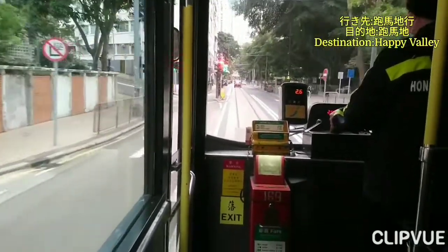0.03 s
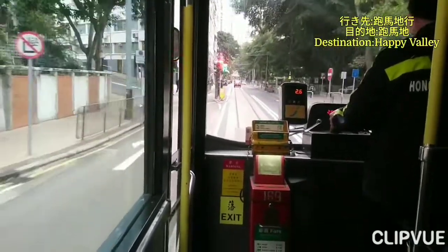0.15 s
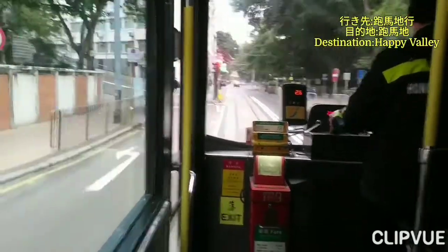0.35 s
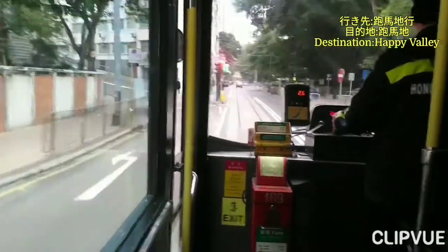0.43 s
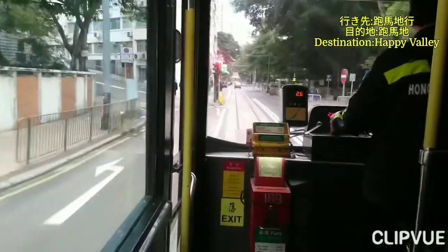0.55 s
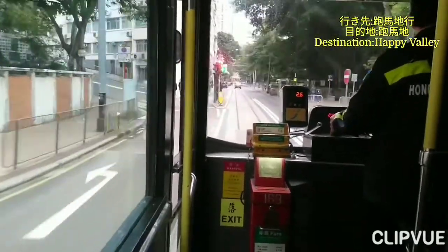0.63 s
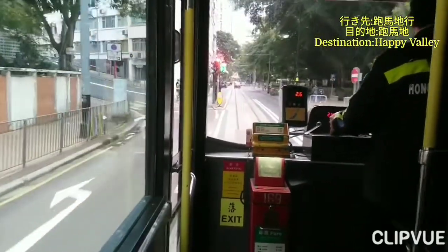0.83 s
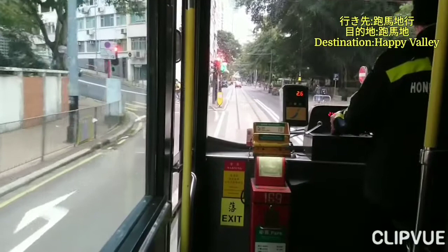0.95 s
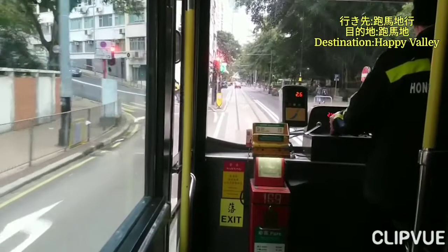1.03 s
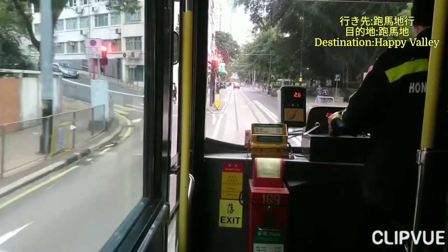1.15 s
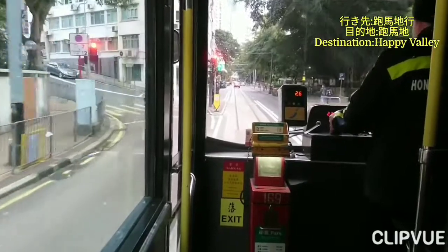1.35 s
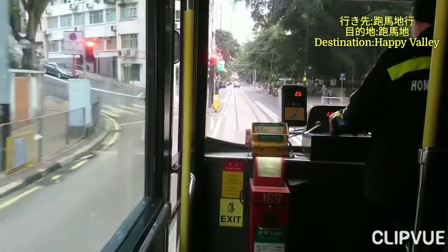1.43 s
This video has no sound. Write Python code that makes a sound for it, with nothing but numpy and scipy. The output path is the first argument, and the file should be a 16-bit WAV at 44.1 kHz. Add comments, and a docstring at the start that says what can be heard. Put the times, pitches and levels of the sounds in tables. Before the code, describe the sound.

Tram wheels knock heavily over a rail joint in two dull clusters, with low rolling rumble

```python
"""Two axles of a tram cross a rail joint: each gives a cluster of dull knocks, heard inside the cab.
The knocks are short low tones; shudders, rattles and ticking fittings are shaped noise and ringing taps.
Underneath are a low rumble and roar of rolling, made of coloured noise, and a wavering hum in the floor.
Short puffs of air, made of bright noise, hiss near the driver's desk."""
import sys
import numpy as np
from scipy import signal
from scipy.io import wavfile
from scipy.ndimage import uniform_filter1d

SR = 44100
rng = np.random.default_rng(int(sys.argv[2]) if len(sys.argv) > 2 else 0)


def to_wav(s):
    """Save 16-bit WAV."""
    ch = np.atleast_2d(s).T  # columns
    pcm = np.round(np.clip(ch, -1, 1) * 32767)  # PCM
    wavfile.write(sys.argv[1], SR, pcm.astype(np.int16))


N = 66150  # length in samples: 1.5 s

# loudness of the rolling over time: time_s, rumble_db, roar_db (the upper part)
ROLLING_LEVELS = [(0.0, -45.5, -59), (0.162, -40, -62), (0.35, -38.5, -62), (0.568, -40, -57.5),
                  (0.792, -42.5, -57.5), (0.94, -45, -58), (1.148, -44.5, -55.5), (1.5, -45, -56)]


def amp(db):
    """Turn decibels into a plain multiplier."""
    return 10 ** (np.asarray(db) / 20)


def evened(x):
    """Scale a signal to an average (RMS) strength of 1."""
    return x / np.sqrt(np.mean(x ** 2) + 1e-20)


def curve(table, column):
    """Join the points of one table column by straight lines; the first column is time."""
    rows = np.array(table)
    return np.interp(np.arange(N) / SR, rows[:, 0], rows[:, column])


def add(mix, start_s, sound):
    """Add a short sound to the mix in place, cut off at the end of the mix."""
    part = mix[round(start_s * SR):][:len(sound)]
    part += sound[:len(part)]


def noise(spectrum, patchy_db):
    """Noise of a given colour, built from random short-time spectra with drifting patches."""
    hz = np.fft.rfftfreq(2048, 1 / SR)
    real, imaginary, patches = rng.standard_normal((N // 512 + 5, 1025, 3)).T
    patches = uniform_filter1d(patches, size=10, axis=0)  # smooth across pitch
    patches = evened(uniform_filter1d(patches, size=4, axis=1))  # smooth over time
    table_hz, level_db = np.transpose(spectrum)
    colour_db = np.interp(np.log(hz + 1), np.log(table_hz + 1), level_db, left=-90, right=-90)
    frames = (real + 1j * imaginary) * amp(colour_db[:, None] + patchy_db * patches)
    return evened(signal.istft(frames, nperseg=2048, noverlap=1536)[1][:N])


def band(x, hz, width_hz):
    """Keep a band around one pitch: a resonance applied four times, for steep skirts."""
    turn = np.exp(2j * np.pi * hz * np.arange(len(x)) / SR)
    r = np.exp(-2 * np.pi * width_hz / SR)
    two_stages = [(1 - r) ** 2, 0, 0, 1, -2 * r, r * r]
    # shift the pitch down to zero, smooth, then shift back up
    smooth = signal.sosfilt([two_stages] * 2, x / turn)
    return 2 * (turn * smooth).real


def swells(rows):
    """Sum of loudness curves that swell smoothly to a peak and die exponentially."""
    t = np.arange(N) / SR
    total = np.zeros(N)
    for peak_s, db, rise_s, t60_s in rows:
        swell = np.exp(-.5 * ((t - peak_s) / rise_s) ** 2)
        fade = amp(-60 * np.maximum(t - peak_s, 0) / t60_s)
        total += amp(db) * np.where(t < peak_s, swell, fade)
    return total


def rolling():
    """Wheel on rail, heard through floor and windows: low rumble and upper roar of coloured noise."""
    # colour of each noise: pitch_hz, level_db (per Hz, relative)
    rumble_colour = [(18, -44), (30, -19.5), (54, -10), (130, -12.5), (203, 1), (317, 2.5), (387, -9),
                     (413, -9.5), (538, -15.5), (700, -30.5), (910, -51.5), (1540, -120)]
    roar_colour = [(240, -34), (400, -2), (640, -7.5), (791, -17.5), (1170, -13), (1310, -15), (1590, -19),
                   (3450, -27.5), (4130, -44), (15000, -56)]
    rumble = amp(curve(ROLLING_LEVELS, column=1)) * noise(rumble_colour, patchy_db=1.5)
    roar = amp(curve(ROLLING_LEVELS, column=2)) * noise(roar_colour, patchy_db=2.2)
    return rumble + roar


def hum():
    """The car body booms at one low pitch that wavers, with overtones and a rough band of noise."""
    # loudness of the hum: time_s, level_db
    hum_levels = [(0.0, -49.5), (0.086, -60.5), (0.312, -27.5), (0.35, -55.5), (0.376, -36), (0.4, -47.5),
                  (0.48, -32.5), (0.61, -34), (0.65, -26), (0.692, -43.5), (0.71, -39), (0.76, -38.5),
                  (0.848, -35.5), (0.88, -40), (0.926, -31.5), (0.98, -33), (1.076, -68), (1.14, -50),
                  (1.178, -68), (1.232, -51.5), (1.356, -52.5), (1.386, -70), (1.424, -40), (1.5, -59)]
    # overtones: multiple of the hum pitch, level_db relative to the lowest tone
    overtones = [(2, -17.5), (3, -14)]
    pitch_hz, waver, roughness = 55.25, 0.023, 0.45  # waver: typical drift as a share of the pitch
    drift = evened(uniform_filter1d(rng.standard_normal(N), size=3000))
    phase = 2 * np.pi * np.cumsum(pitch_hz * (1 + waver * drift)) / SR
    tone = np.cos(phase)
    for multiple, db in overtones:
        tone += amp(db) * np.cos(multiple * phase)
    rough = evened(band(rng.standard_normal(N), hz=62, width_hz=72))
    return amp(curve(hum_levels, column=1)) * (np.sqrt(2) * tone + roughness * rough)


def grit():
    """Loose fittings tick at random, each ringing briefly at its own pitch."""
    low_hz, high_hz, tilt_db_per_octave = 701.4, 2997, -8
    ticks_per_s, rise_s, t60_s, spread_db = 500, 0.0037, .045, 2.5
    below_roar_db = -4.5
    out, t = np.zeros(N), np.arange(SR // 8) / SR
    pitches = np.geomspace(low_hz, high_hz, num=40)
    for hz in pitches:
        hits = rng.random(N) < ticks_per_s / len(pitches) / SR
        # a few ticks are much stronger, up to a limit
        ticks = hits * amp(spread_db * np.minimum(rng.exponential(1, N), 3))
        fade = amp(tilt_db_per_octave * np.log2(hz / low_hz) - 60 * t / t60_s)
        ring = np.sin(2 * np.pi * hz * t) * (1 - np.exp(-t / rise_s)) * fade
        out += signal.oaconvolve(ticks, ring)[:N]
    return amp(curve(ROLLING_LEVELS, column=2) + below_roar_db) * evened(out)


def puffs():
    """Escaping air gives a wide hiss; each puff has its own share of the highest treble."""
    # puffs of air: peak_s, level_db, rise_s, t60_s (time to fall 60 dB), treble_db (change above the corner)
    air_puffs = [(0.407, -69.5, 0.0055, 0.086, -3), (0.437, -56.5, 0.008, 0.049, -7),
                 (0.455, -63.5, 0.0013, 0.18, -21.5), (0.557, -51.5, 0.0095, 0.18, -4),
                 (.575, -89, 0.0047, 0.17, 3.5), (.6, -71, 0.0058, 0.17, 5.5),
                 (0.886, -66.5, .001, .02, -6)]
    # colour of the air: pitch_hz, level_db (per Hz, relative)
    air_colour = [(1470, -14), (2500, 14), (3050, 2), (3450, 4.5), (4810, 11), (5650, 9), (12000, 10),
                  (15700, 15)]
    corner_hz = 10100
    air = noise(air_colour, patchy_db=1.5)
    low = signal.sosfiltfilt(signal.butter(2, corner_hz, fs=SR, output="sos"), air)
    treble = air - low
    low_rows = [row[:4] for row in air_puffs]
    treble_rows = [(s, db + treble_db, rise, t60) for s, db, rise, t60, treble_db in air_puffs]
    return low * swells(low_rows) + treble * swells(treble_rows)


def rattles():
    """A jolt shakes panels: dense uneven taps ring a panel and die away."""
    # shaken panels: start_s, level_db (before rise and fade), centre_hz, width_hz, t60_s (time to fall 60 dB)
    panels = [(.232, -43, 980, 500, 0.18), (.262, -66, 5500, 1500, 0.52), (.23, -47, 2820, 1580, 0.28),
              (0.261, -41, 1817, 2000, 0.1), (0.371, -51.5, 3100, 700, 0.073),
              (.453, -44.5, 1950, 700, 0.062), (.385, -58.5, 2300, 500, 0.14),
              (0.571, -44.5, 2150, 300, 0.086), (.56, -53, 3700, 500, 0.14), (0.558, -60, 5600, 600, 0.25),
              (.59, -52.5, 2440, 300, 0.13), (.612, -50, 2350, 420, 0.17), (.643, -39, 1610, 1500, 0.13),
              (0.638, -64.5, 5900, 800, .3), (.692, -41.5, 1500, 1300, 0.14),
              (.752, -50, 1640, 1200, 0.073), (0.828, -50, 1200, 500, 0.11), (0.876, -53, 1550, 1800, 0.15),
              (0.927, -54, 1030, 900, 0.36), (.925, -58, 2000, 900, 0.24), (1.02, -49, 1670, 1500, 0.062),
              (1.209, -47, 2480, 410, 0.2), (1.207, -53.5, 3200, 700, 0.21), (1.21, -79, 5550, 500, 0.8),
              (1.2, -61, 2840, 1200, 0.31), (1.349, -47, 1070, 500, 0.12), (1.447, -45.5, 590, 420, 0.086),
              (1.44, -56.5, 1900, 1160, 0.17), (0.0054, -51, 900, 380, 0.37)]
    rise_s, clatter_db = .004, 2  # clatter: typical unevenness of the taps
    out, t = np.zeros(N), np.arange(SR // 3) / SR
    for start_s, db, hz, width_hz, t60_s in panels:
        white, lumps = rng.standard_normal((2, len(t)))
        taps = white * amp(clatter_db * evened(uniform_filter1d(lumps, size=120)))
        ringing = evened(band(taps, hz, width_hz))
        add(out, start_s, ringing * (1 - np.exp(-t / rise_s)) * amp(db - 60 * t / t60_s))
    return out


def shudders():
    """The body shudders after each axle's blow: broad dull noise from floor and walls."""
    # shudders: peak_s, level_db, rise_s, t60_s (time to fall 60 dB)
    shakes = [(.245, -23, 0.019, 0.17), (.3, -38, .015, 0.47), (.45, -43.5, 0.014, 0.24),
              (.64, -27, 0.029, 0.33), (.7, -33, 0.0088, 0.21), (.76, -43.5, 0.0085, 0.2),
              (.9, -40, 0.013, 0.66)]
    # colour of the shaking: pitch_hz, level_db (per Hz, relative)
    shake_colour = [(60, -26), (100, 0.5), (170, 4), (330, -1.5), (500, -6.5), (700, -18), (1100, -17),
                    (1500, -35), (2500, -36), (3800, -47.5), (6000, -66.5), (7500, -80.5)]
    return swells(shakes) * noise(shake_colour, patchy_db=1.24)


def knocks():
    """Axles jolt the floor: each knock is a few cycles of a low tone that swell and die."""
    # knocks in the floor: peak_s, peak_db, pitch_hz, swell_s
    floor_knocks = [(.055, -35, 293, 0.003), (.183, -29.5, 300, 0.012), (0.195, -25, 268, 0.0071),
                    (0.214, -11, 301, 0.0023), (.226, -13.5, 168, .003), (.233, -6, 288, 0.0021),
                    (.246, -11.5, 261.7, 0.0046), (0.261, -13.5, 306, 0.0049), (0.278, -14, 217, 0.0017),
                    (.302, -21, 173.6, 0.0069), (0.38, -27, 211, 0.0031), (.403, -23.5, 201, 0.0037),
                    (.414, -26.5, 231, 0.003), (0.45, -31, 167.7, 0.011), (0.459, -26.5, 245.4, 0.0075),
                    (0.491, -34, 156, .008), (.572, -30.5, 131.7, 0.0038), (0.601, -14.5, 259, 0.0046),
                    (.617, -7, 272.7, 0.0041), (0.636, -11.5, 177.5, 0.001), (0.676, -22.5, 269, 0.0033),
                    (0.696, -25.5, 185.2, 0.0024), (0.717, -31, 240, 0.0093), (0.746, -29, 276, 0.0079),
                    (.735, -34, 88.6, 0.012), (.765, -33.5, 171, .008), (.838, -23.5, 110, 0.0024),
                    (0.908, -39, 124, 0.0026), (1.439, -40, 44.6, 0.029), (1.49, -40, 47.99, 0.023)]
    fall = 1.175  # a knock dies this many times slower than it swells
    out, t = np.zeros(N), np.arange(-.04, .06, 1 / SR)  # seconds around the peak
    for peak_s, db, hz, swell_s in floor_knocks:
        width_s = swell_s * np.where(t < 0, 1, fall)
        shape = np.exp(-.5 * (t / width_s) ** 2)
        add(out, peak_s + t[0], amp(db) * shape * np.cos(2 * np.pi * hz * t))
    return out


def scene():
    """All layers added together, as one channel."""
    background = rolling() + hum() + grit()
    return (background + puffs() + rattles() + shudders() + knocks())[None]


def record(dry):
    """Faint microphone hiss, bass roll-off, then a limit on the highest treble."""
    hiss_db, bass_hz, treble_limit_hz = -88, 34.8, 15850  # hiss level before the filters
    wet = dry + amp(hiss_db) * rng.standard_normal(dry.shape)
    wet = signal.sosfilt(signal.butter(4, bass_hz, "high", fs=SR, output="sos"), wet)
    treble_limit = signal.firwin(1023, treble_limit_hz, window=("kaiser", 9), fs=SR)
    return signal.oaconvolve(wet, treble_limit[None], "same")


dry = scene()
out = record(dry)
to_wav(out)
```